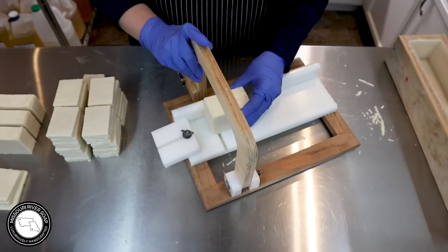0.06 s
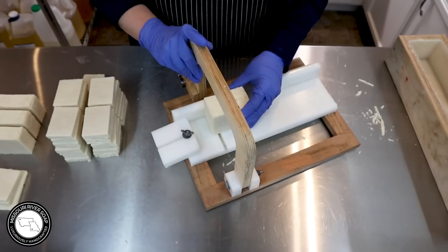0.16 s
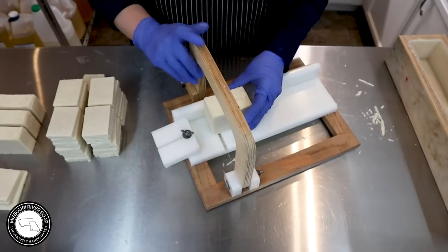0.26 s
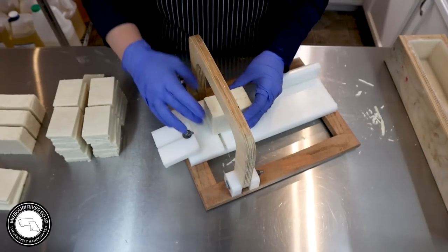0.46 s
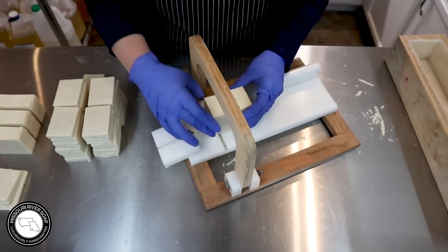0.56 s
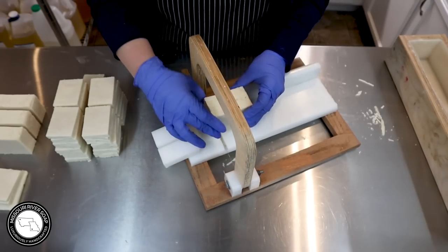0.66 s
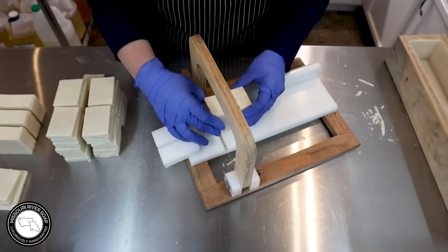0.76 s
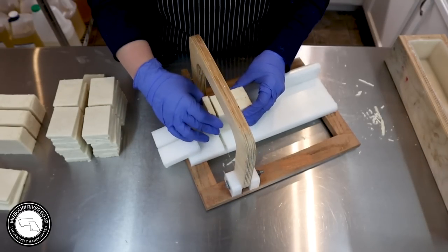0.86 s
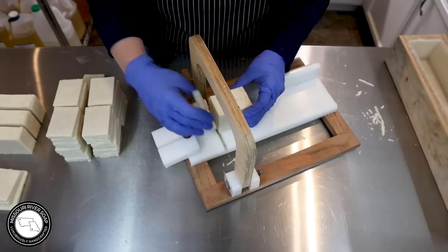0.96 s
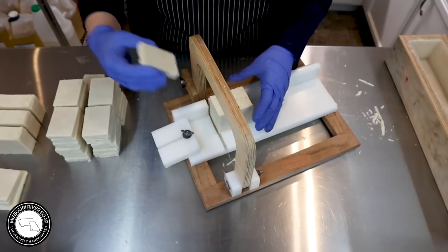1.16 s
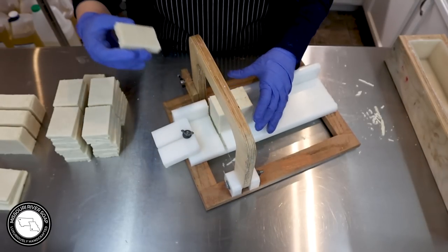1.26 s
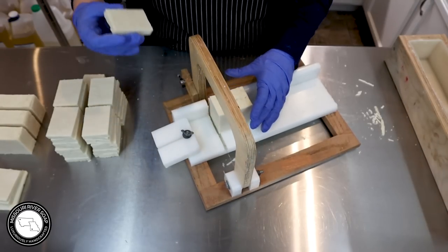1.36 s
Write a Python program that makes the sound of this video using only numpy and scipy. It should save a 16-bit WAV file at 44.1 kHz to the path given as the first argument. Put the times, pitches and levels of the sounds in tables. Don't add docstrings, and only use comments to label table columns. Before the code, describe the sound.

A loud wooden knock dominates: at about 0.22 s a cutter arm hits its stop in two bursts barely 0.01 s apart, with sharp cracks, a clack and low thud. Before it, soft hand rumble and a tick at 0.14 s. The steel table and hard room ring for about half a second, briefly dipping in level after the clipped peak. Faint glove rustle and ticks follow, strongest around 1.2 s, over quiet fan hum.

```python
import sys
import numpy as np
from scipy import signal
from scipy.fft import rfft, irfft, next_fast_len
from scipy.io import wavfile
from scipy.ndimage import map_coordinates

SR = 44100
rng = np.random.default_rng(int(sys.argv[2]) if len(sys.argv) > 2 else 0)


def dump(signal):
    limited = np.clip(np.atleast_2d(signal).T, -1, 1)
    pcm = np.round(limited * 32767).astype(np.int16)
    wavfile.write(sys.argv[1], SR, pcm)


def makeup_ratio(level_db):
    decades = np.asarray(level_db, float) / 20
    return 10 ** decades


N = 61739
TIME = np.arange(N) / SR


def unit(x):
    return x / np.sqrt(np.mean(x ** 2) + 1e-20)


def along(points, hz):
    pitch, value = np.transpose(points)
    return np.interp(np.log(hz + 1), np.log(pitch + 1), value)


def filtered(x, response):
    size = next_fast_len(N + 8192)
    spectrum = rfft(x, size) * response(np.fft.rfftfreq(size, 1 / SR))
    return irfft(spectrum, size)[:N]


def noise(response):
    return unit(filtered(rng.standard_normal(N), response))


def peak(center_hz, width_hz):
    return lambda f: 1j * f * width_hz / (center_hz ** 2 - f * f + 1j * f * width_hz)


def power_peaks(rows):
    return lambda f: sum(makeup_ratio(db) * np.abs(peak(hz, width)(f)) ** 2 for hz, width, db in rows)


def level(rows):
    return makeup_ratio(np.interp(TIME, *np.transpose(rows)))


def ring(modes, start_s, scatter_db):
    since = np.maximum(TIME - start_s, 0)
    out = np.zeros(N)
    for pitch_hz, level_db, fade_s in modes:
        strength = makeup_ratio(level_db + scatter_db * rng.normal() - 60 * since / fade_s)
        out += strength * np.sin(2 * np.pi * pitch_hz * since)
    return out


# pitch_hz [Hz], level_db [dB per Hz]
AIR_COLOUR = [(20, 3.5), (55, -6.5), (140, -6.5), (260, -11), (560, -11.5), (650, -22.5), (1000, -19.5),
              (16000, -30.5)]
# pitch_hz [Hz], width_hz [Hz], level_db [dB]
FAN_BANDS = [(75.5, 5, -63), (225.4, 6.4, -65), (544, 40, -61.5), (694.5, 12, -69)]
# pitch_hz [Hz], peak_db [dB]
FAN_TONES = [(119.5, -53.5), (532, -58.5), (559, -63)]


def workshop():
    out = makeup_ratio(-51.5) * noise(lambda f: makeup_ratio(along(AIR_COLOUR, f)))
    for pitch_hz, width_hz, level_db in FAN_BANDS:
        out += makeup_ratio(level_db) * noise(peak(pitch_hz, width_hz))
    for pitch_hz, peak_db in FAN_TONES:
        out += makeup_ratio(peak_db) * np.sin(2 * np.pi * pitch_hz * TIME)
    return out


# time_s [s], level_db [dB]
RUSTLE_LEVEL = [
    (0, -66),
    (.42, -70),
    (.5, -63),
    (.57, -67),
    (.95, -87),
    (1.06, -60),
    (1.12, -61),
    (1.2, -59),
    (1.3, -63.5),
    (1.4, -70.5),
]
# pitch_hz [Hz], level_db [dB per Hz]
GLOVE_COLOUR = [(300, -40.5), (800, 8.5), (2000, -0.5), (5000, -0.5), (8500, 1), (10500, -12.5),
                (16000, -38)]


def gloves():
    hiss = rng.standard_normal(N)
    grain_points = rng.standard_normal(400)
    grains = hiss * makeup_ratio(2 * map_coordinates(grain_points, [TIME * 250]))
    return level(RUSTLE_LEVEL) * unit(filtered(grains, lambda f: makeup_ratio(along(GLOVE_COLOUR, f))))


# time_s [s], level_db [dB]
RUMBLE_LEVEL = [
    (0, -40.5),
    (.06, -52.5),
    (.12, -43),
    (.2, -53.5),
    (.6, -60),
    (.9, -54.5),
    (1.1, -63.5),
    (1.4, -78),
]
# pitch_hz [Hz], width_hz [Hz], level_db [dB]
RUMBLE_BANDS = [(148, 69, -3), (210, 30, 0.5), (340, 24, -13)]


def table_rumble():
    return level(RUMBLE_LEVEL) * noise(power_peaks(RUMBLE_BANDS))


# start_s [s], peak_db [dB], pitch_hz [Hz], fade_s [s to fall 60 dB]
TICKS = [(.058, -50, 4500, .005), (.1357, -31, 2000, .004), (.1361, -33, 4500, .004),
         (.1357, -34, 8000, .003), (.1357, -41, 12500, .003), (.534, -46, 8100, .012),
         (.556, -47, 5500, .005), (.696, -49, 3800, .008), (.801, -48, 2000, .005),
         (1.052, -50, 4200, .008), (1.175, -56, 8300, .04), (1.2, -55, 8000, .03), (1.325, -50, 4600, .008)]


def ticks():
    out = np.zeros(N)
    for start_s, peak_db, pitch_hz, fade_s in TICKS:
        hiss = noise(lambda f: peak(pitch_hz, .4 * pitch_hz)(f) ** 2) * (TIME > start_s)
        hiss_fade = makeup_ratio(-14 - 60 * np.abs(TIME - start_s) / (.03 + fade_s))
        click = ring([(pitch_hz, 0, fade_s)], start_s, 0)
        out += makeup_ratio(peak_db) * (click + hiss * hiss_fade)
    return out


BLOW_S = .2168
# pitch_hz [Hz], level_db [dB per Hz]
WASH_COLOUR = [(50, -51.5), (110, -14), (200, -7.5), (1150, -11), (1600, -16.5), (3500, -19), (4600, -28),
               (16000, -42)]
# pitch_hz [Hz], width_hz [Hz], level_db [dB over the wash]
SHIMMER = [(1109, 58, 2.5), (2356, 250, -15), (4030, 350, -4), (5360, 570, 4.5)]
# pitch_hz [Hz], fade_s [s to fall 60 dB]
ROOM_FADE = [(100, .6), (400, 0.51), (1500, 0.54), (4500, 0.51), (7000, 0.5), (10000, 0.4), (15000, 0.278)]


def room_wash():
    def colour(f):
        return makeup_ratio(along(WASH_COLOUR, f)) * (1 + power_peaks(SHIMMER)(f))

    hz, frame_s, bands = signal.stft(noise(colour), SR, nperseg=256)
    fade_s = np.abs(along(ROOM_FADE, hz))[:, None]
    bands = bands * makeup_ratio(-60 * np.maximum(frame_s - BLOW_S, 0) / fade_s)
    wash = signal.istft(bands, SR, nperseg=256)[1][:N]
    rise = 1 - np.exp(-np.maximum(TIME - BLOW_S, 0) / 0.0065)
    return makeup_ratio(-8.5) * wash * rise


# pitch_hz [Hz], level_db [dB], fade_s [s to fall 60 dB], bloom_s [s to swell]
TABLE_TONES = [(74.4, -11.5, 0.44, .03), (148.5, -10.5, .45, .01), (159.8, -16.5, 0.59, .01),
               (236.7, -18.5, 0.84, 0.025), (283, -5.5, 0.54, 0.022), (312.8, -15, 0.26, .01),
               (394.8, -4.5, 0.47, 0.046), (457, -18, 0.54, 0.0205), (739.4, -15.5, .5, 0.027),
               (808, -23.5, .6, 0.028), (946, -20.5, 0.5, 0.011), (1089, -30, .4, 0.024),
               (1180, -30.5, 0.46, .01), (420, -19, 0.35, 0.026)]


def table_ring():
    since = np.maximum(TIME - BLOW_S, 0)
    out = np.zeros(N)
    for pitch_hz, level_db, fade_s, bloom_s in TABLE_TONES:
        swell = (1 - np.exp(-since / abs(bloom_s))) ** 2
        out += ring([(pitch_hz, level_db, fade_s)], BLOW_S, 0) * swell
    return makeup_ratio(-2.5) * out


# pitch_hz [Hz], level_db [dB], fade_s [s to fall 60 dB]
FRAME_TONES = [(574, -22, 0.081), (663, -12, 0.079), (721, -12, 0.051), (1227, -16.5, .06),
               (1566, -21, 0.0295)]
# pitch_hz [Hz], level_db [dB], fade_s [s to fall 60 dB]
THUD_TONES = [(172.8, -11.5, 0.11), (196, -2, 0.034), (478, -22, 0.027)]


def frame_and_base():
    thud_s, thud_rise_s = .2185, 0.0058
    thud_rise = 1 - np.exp(-np.abs(TIME - thud_s) / thud_rise_s)
    return ring(FRAME_TONES, .2172, 0) + ring(THUD_TONES, thud_s, 0) * thud_rise


# start_s [s], crack_db [dB], clack_db [dB]
CONTACTS = [
    (.2158, -36, -34),
    (.2168, -11, -14),
    (.2187, -13, -6),
    (.2207, -18, -14),
    (.2256, -11, -2),
    (.2267, -14, 3),
]
# pitch_hz [Hz], level_db [dB], fade_s [s to fall 60 dB]
STOP_TONES = [(2050, -4, .012), (2500, -2, .008), (3050, -4, .011), (3650, -6, .01), (4300, -9, .01),
              (6100, -12, .008), (7100, -12, .008)]


def arm():
    crack_fade_s, crack_top_hz = .013, 6000
    out = np.zeros(N)
    for start_s, crack_db, clack_db in CONTACTS:
        crack = noise(lambda f: f / (f + 600) / (1 + (f / crack_top_hz) ** 1.5))
        crack *= (TIME > start_s) * makeup_ratio(-60 * np.abs(TIME - start_s) / crack_fade_s)
        out += makeup_ratio(crack_db) * crack + makeup_ratio(clack_db) * ring(STOP_TONES, start_s, 0.92)
    return out


def scene():
    knock = frame_and_base() + arm() + room_wash() + table_ring()
    handling = ticks() + gloves() + table_rumble()
    return (knock + handling + workshop())[None]


def top_cut(x):
    return signal.sosfilt(signal.butter(12, 16270, fs=SR, output="sos"), x)


def record(dry):
    duck_at_s, fall_s, hold_s, back_s, duck_db = 0.2279, 0.026, .014, 0.0547, -8.5
    duck_times = duck_at_s + np.cumsum([0, fall_s, hold_s, back_s])
    mix = dry[0] * level(list(zip(duck_times, [0, duck_db, duck_db, 0])))
    mix = mix / (1 + np.abs(mix / 1.05) ** 8) ** (1 / 8)

    low_hz, top_hz, edge_hz = 55, 16250, 700

    def band_limits(f):
        low_cut = (1j * f / (low_hz + 1j * f)) ** 2
        return np.clip((top_hz - f) / edge_hz, 0, 1) * low_cut

    mix = filtered(mix, band_limits)[None]
    return top_cut(mix)


dry = scene()
out = record(dry)
dump(out)
```